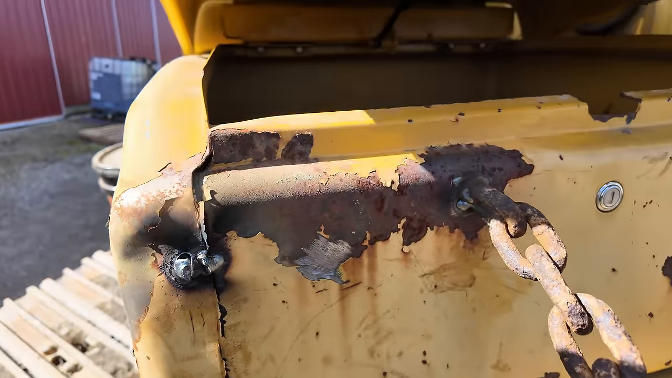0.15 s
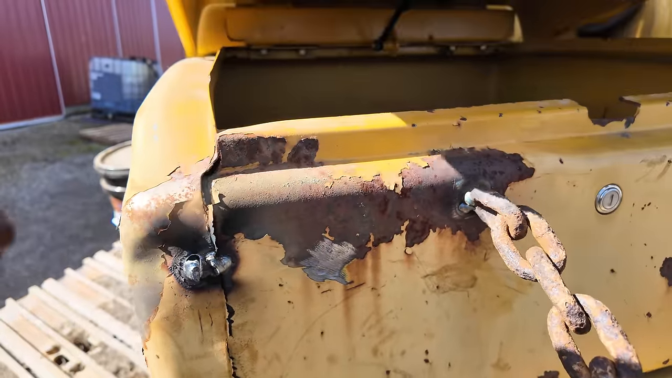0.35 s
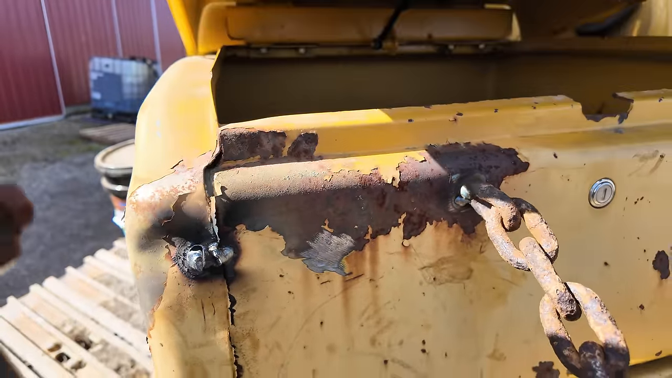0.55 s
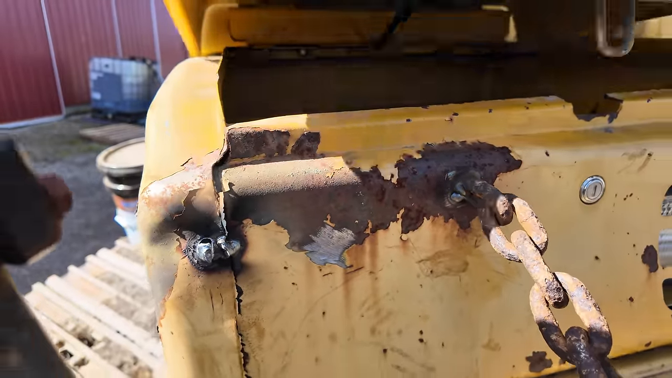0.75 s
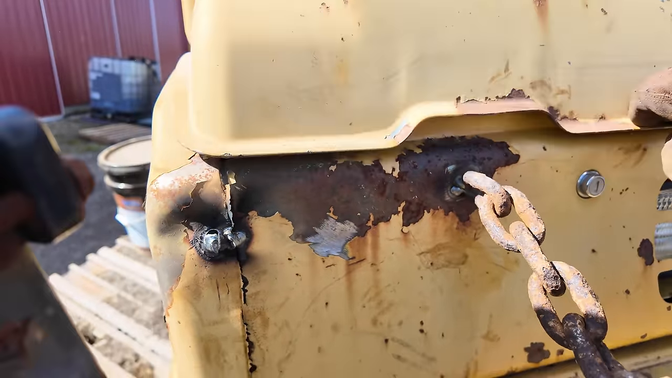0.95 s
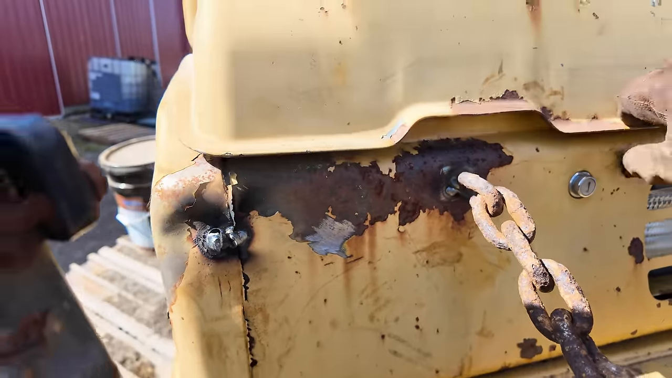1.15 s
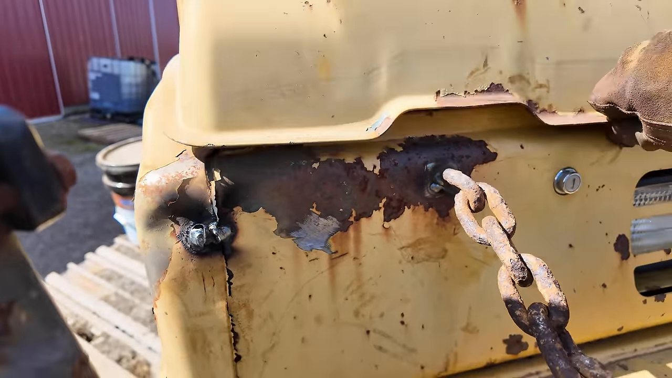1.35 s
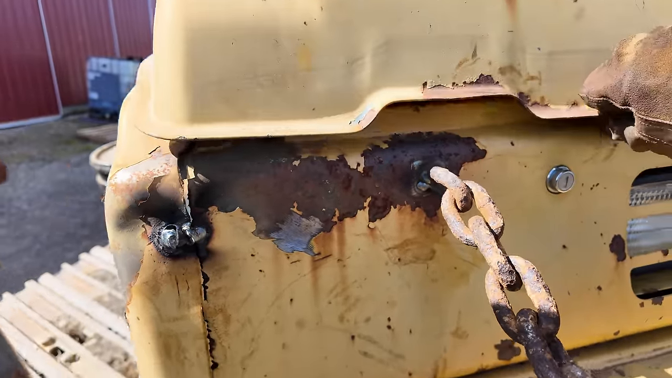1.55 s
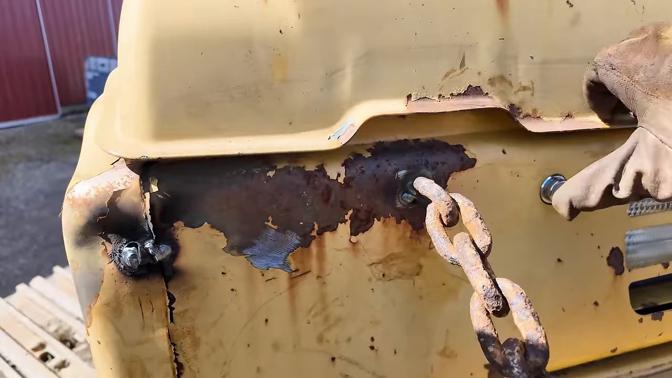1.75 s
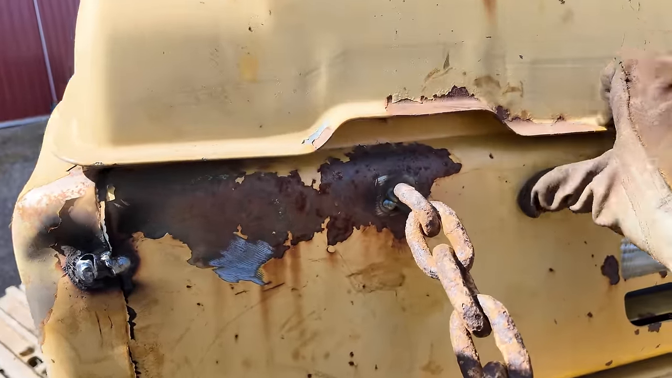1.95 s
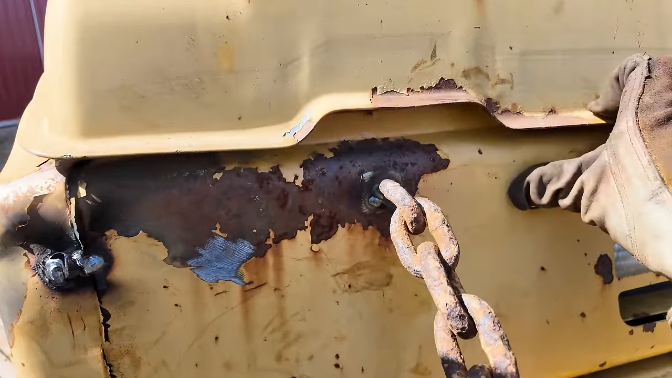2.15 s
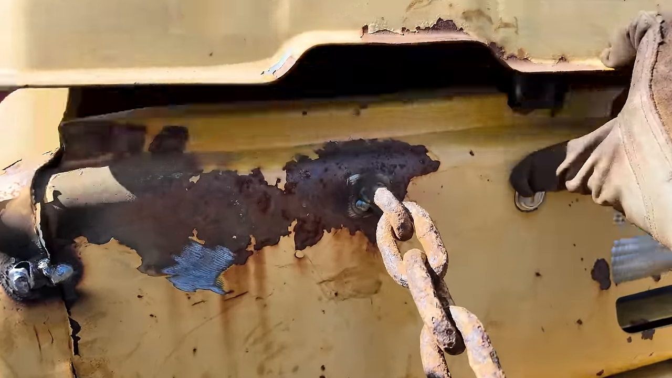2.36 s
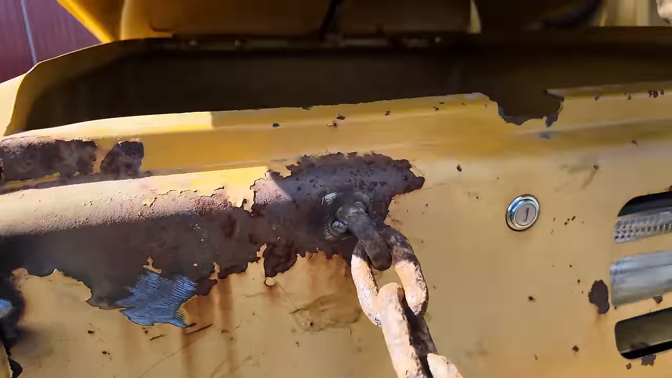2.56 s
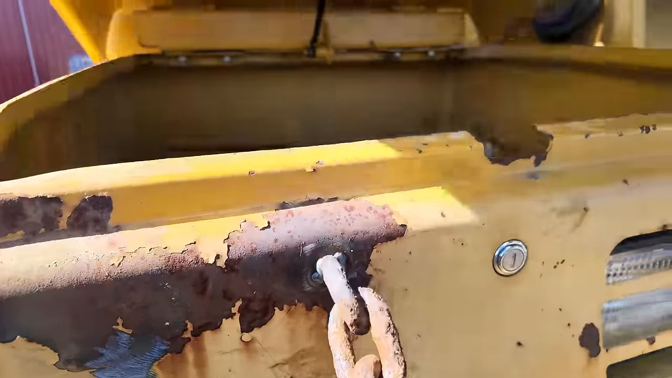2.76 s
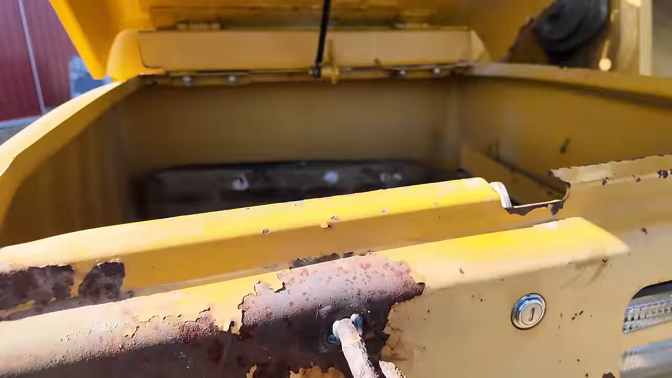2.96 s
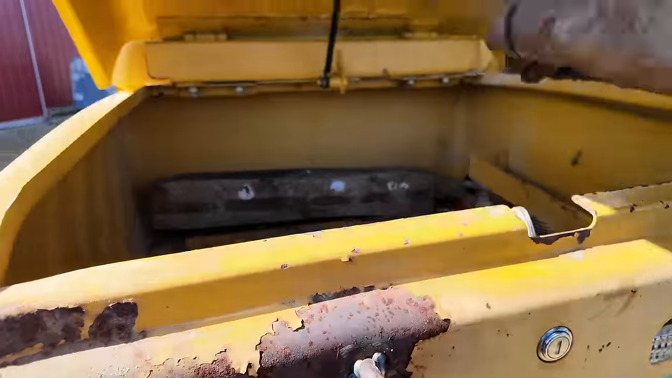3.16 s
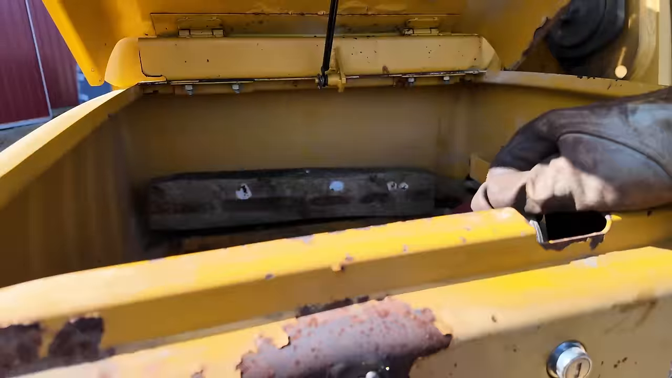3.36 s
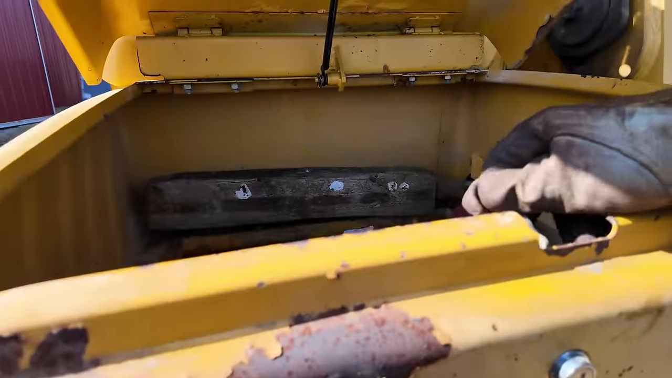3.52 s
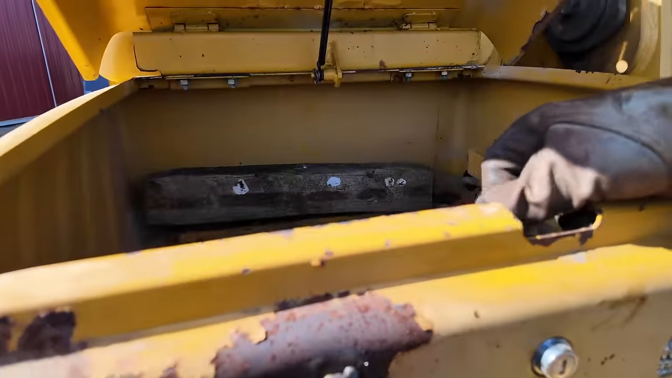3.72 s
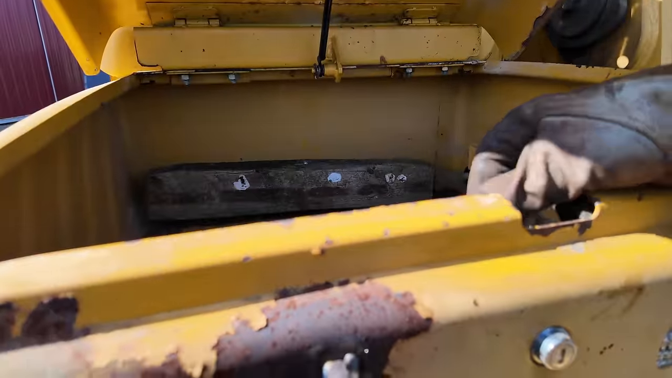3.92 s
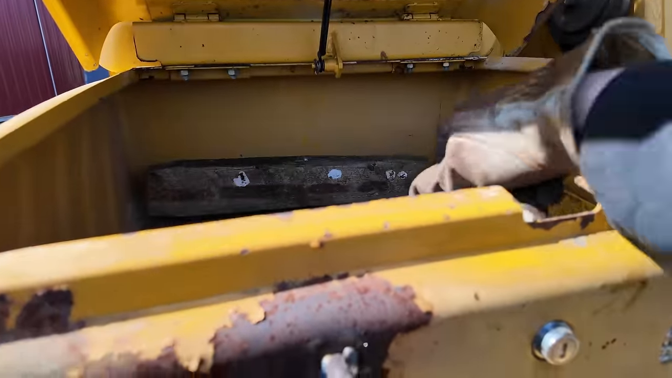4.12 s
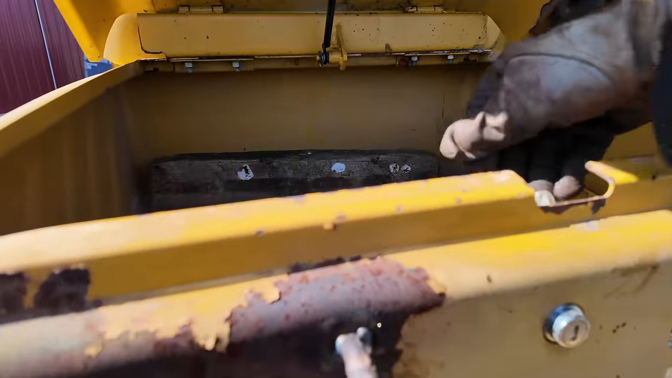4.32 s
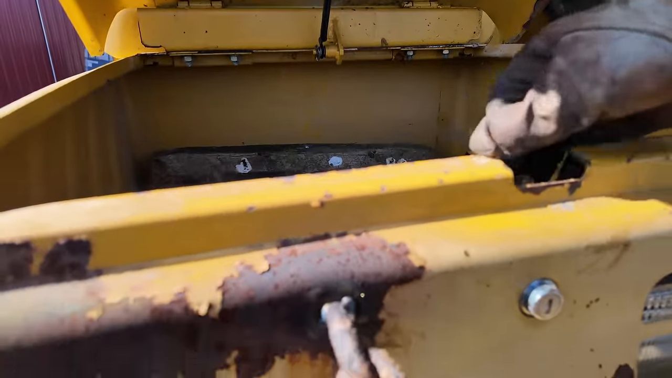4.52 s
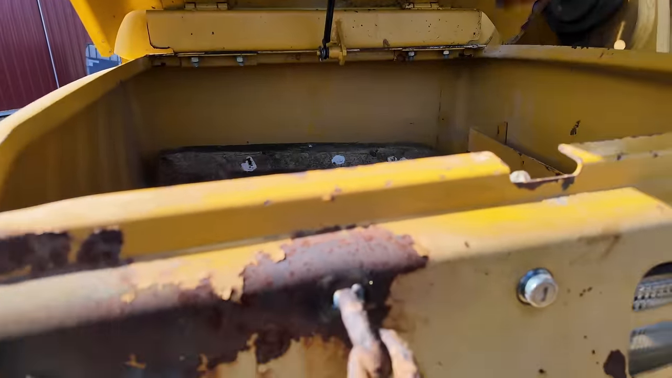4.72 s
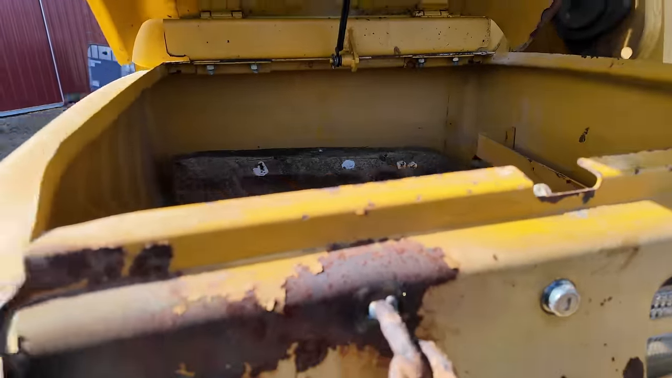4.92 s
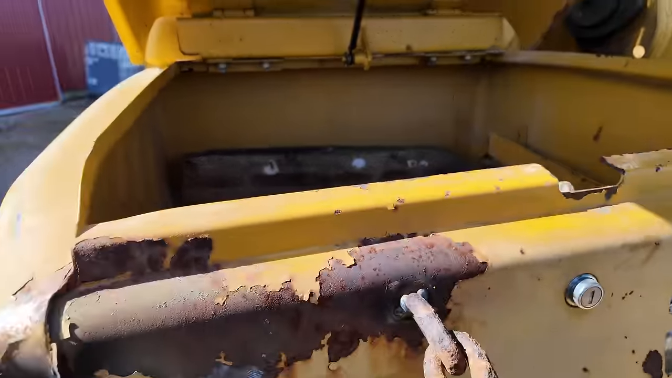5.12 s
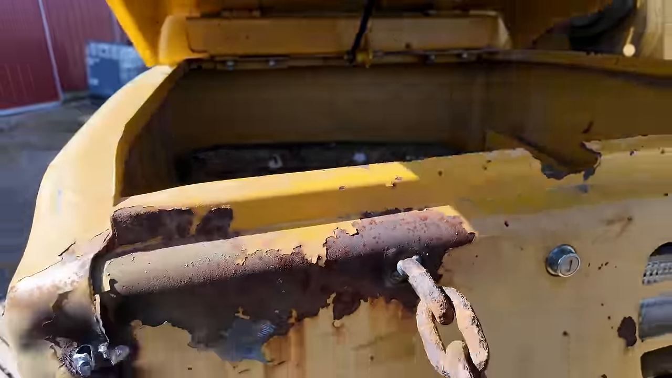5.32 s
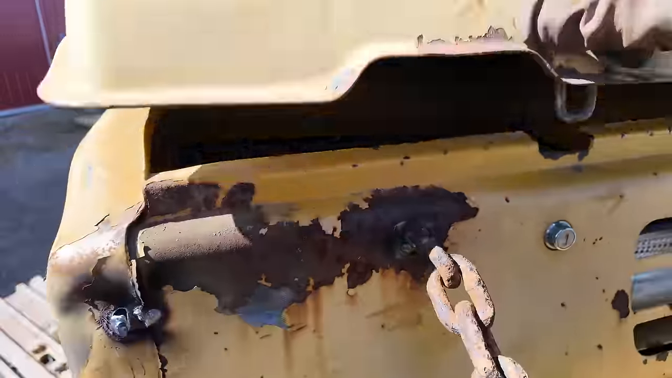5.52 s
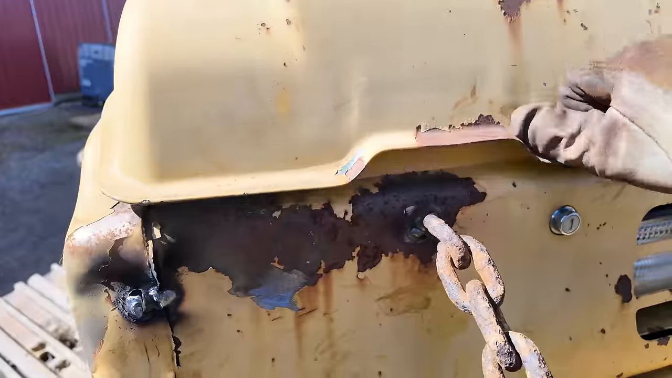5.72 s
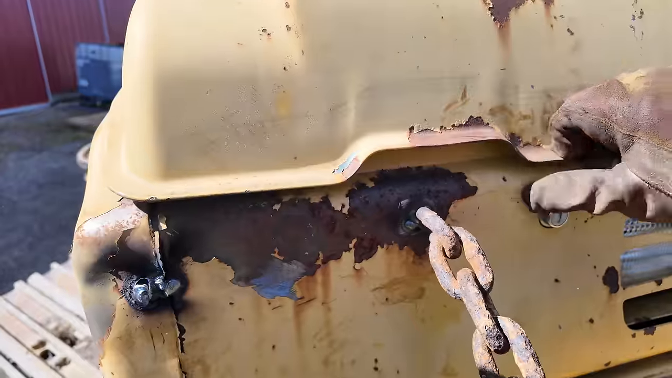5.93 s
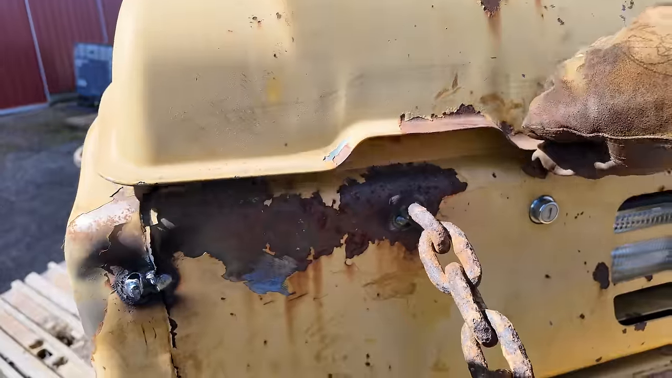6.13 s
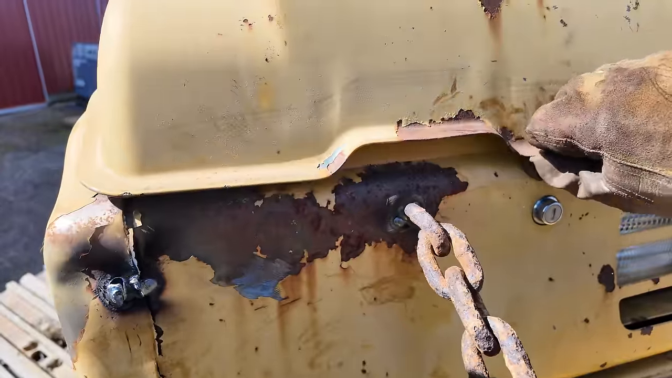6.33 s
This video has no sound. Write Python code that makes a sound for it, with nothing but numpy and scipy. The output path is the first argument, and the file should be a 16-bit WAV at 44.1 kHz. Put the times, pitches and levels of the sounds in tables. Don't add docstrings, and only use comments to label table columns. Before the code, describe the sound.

A diesel engine idles low in an open yard with faint wind rumble. Close to the microphone, a heavy steel lid drops onto its rim at one second, clanging, rattling and booming. Small metal touches follow, then a faint hiss as it lifts. Two hard, hollow latch snaps come about a second apart. Near the end the lid slams again with a deeper boom, bouncing and rattling, then a small final clack.

```python
import sys
import numpy as np
from scipy import signal
from scipy.io import wavfile
from scipy.ndimage import uniform_filter1d

SR = 44100
rng = np.random.default_rng(int(sys.argv[2]) if len(sys.argv) > 2 else 0)


def wav_out(sig):
    wavfile.write(sys.argv[1], SR, np.round(np.clip(np.atleast_2d(sig).T, -1, 1) * 32767).astype(np.int16))


def field_ratio(decibels):
    return 10 ** (np.asarray(decibels, dtype=float) / 20)


N = 281358
TIME_S = np.arange(N) / SR

# middle_s, width_s, level_db
GUSTS = [(0.02, 0.096, -55), (0.59, .04, -58), (0.82, 0.068, -48), (1.3, 0.4, -49), (2.3, .12, -45),
         (2.5, 0.065, -47), (3.0, 0.046, -47), (3.55, .1, -49), (4.46, 0.063, -43), (5.21, 0.041, -51),
         (5.75, 0.083, -40), (6.28, 0.062, -42)]
# freq_hz, level_db
WIND_SPECTRUM = [(15, -44), (30, -24.5), (50, -4.5), (75, 6.5), (130, 11), (300, -60.0)]

# time_s, rate_hz
FIRING_RATE = [(0, 34), (1.5, 35), (6.38, 35)]
# time_s, level_db
ENGINE_LEVEL = [(0, -41), (2.4, -39.5), (3.1, -39.5), (3.4, -38), (4.3, -41), (4.8, -39), (6.38, -40.5)]
# freq_hz, density_db_per_hz
ROAR_SPECTRUM = [(15, -64.5), (25, -36.5), (59, -17), (117, -23.5), (153, -2.5), (180, -10), (242, -1),
                 (301, -12), (641, -14.5), (695, -18), (818, -14.5), (911, -21), (1260, -28), (1790, -40),
                 (16000, -76.5)]
# freq_hz, width_hz, gain_db
ROAR_PEAKS = [(224, 16.7, -2.5), (600, 330, 1.5), (810, 130, -2.5), (1283, 66, 5.5), (2630, 730, 9.5)]
# multiple_of_rate, level_db
FIRING_ORDERS = [(2, -20), (6, -7), (7, -2.5), (8, -6), (14, -16.5), (15, -13.5), (16, -11.5), (17, -16.5),
                 (18, -14.5), (23, -16)]
CYLINDER_DB = [-1, 1.5, -2, 0.1, -2, 4]
# time_s, level_db
KNOCK_LEVEL = [(0, -35.5), (1.8, -32), (2.2, -19), (2.9, -26), (3.4, -35.5), (6.38, -35)]

# freq_hz, density_db_per_hz
STRUT_SPECTRUM = [(1200, -25.5), (2000, -1), (3200, 1.5), (4300, -7), (7500, -15), (10500, -24.5),
                  (13000, -27.5), (16000, -37.5)]
# start_s, length_s, level_db
STROKES = [(1.68, .18, -75), (2.17, .26, -69.5), (2.584, 0.57, -64.5), (3.2, .24, -71.5), (4.02, 0.15, -71),
           (4.96, 0.26, -69), (5.35, 1.1, -72.5)]
# freq_hz, t60_s
YARD_DECAY = [(150, 1), (500, 0.74), (2000, 0.27), (6000, 0.18), (12000, 0.15)]

# start_s, level_db, pitch_hz
GRIT = [(1.863, -60, 6300), (1.863, -64, 7800), (1.863, -66, 9500), (3.547, -58, 8000), (3.588, -57, 6600),
        (3.672, -64, 7300), (5.193, -64, 8000), (6.131, -63, 7000)]
# pitch_hz, level_db, t60_s
LINK_MODES = [(6035, 0, .075), (7350, -11, .06), (8700, -15, .05)]
# start_s, level_db
LINK_TAPS = [(1.170, -63), (1.219, -61), (1.263, -65), (1.322, -69)]
# start_s, level_db, pitch_hz, t60_s
CATCH_RINGS = [
    (1.090, -47, 7100, .05),
    (2.134, -68, 8500, .04),
    (4.055, -62, 7000, .05),
    (5.722, -30, 7300, .09),
    (5.802, -42, 7300, .06),
]
# start_s, level_db, pitch_hz, t60_s
SLAPS = [
    (1.0085, -8.5, 1170, 0.015),
    (1.0080, -5, 472, 0.025),
    (4.433, -17.5, 217.6, 0.22),
    (3.882, -36, 1400, .04),
    (3.882, -36, 2080, .04),
    (4.4404, -9, 425, .08),
    (1.501, -35.5, 2030, 0.068),
    (4.090, -24, 330, .1),
    (1.955, -29.5, 450, 0.15),
]
# start_s, level_db, pitch_hz, rise_s, t60_s
LID_FLEXES = [
    (1.001, -26, 84, 0.04, 0.8),
    (1.04, -17, 133.6, 0.056, 0.4),
    (5.72, -3.5, 75.5, 0.11, 0.34),
    (5.738, -21, 135.7, 0.062, 1),
    (5.75, -31, 53.4, 0.07, 0.99),
    (5.971, -22, 80.5, 0.021, 0.34),
]

RANGE_HZ = [150, 1500, 5000, 16000]
# pitch_hz, level_db, t60_s
LID_MODES = [(197, -8.5, 0.27), (240.6, -4.5, 0.44), (278, -16.5, 0.34), (315.2, 2.5, 0.17),
             (398, -6, 0.12), (422, -2.5, 0.25), (478, -5.5, 0.15), (546, -17, 0.15), (619, -21.5, .3),
             (697, -16.5, 0.4), (877, -13, 0.2), (1140, -18.5, 0.049), (1356, -14.5, 0.034)]
BOX_MODES = [(432, 1.5, .09), (235, -15, .15), (415, -12, .25), (312, -13, .1), (605, -6, .08),
             (520, -10, .15), (590, -17, .35), (721, -15, .3), (890, -11, .1), (1030, -21, .2),
             (1140, -9, .07), (1400, -11, .06), (1790, -18, .06)]
# freq_hz, level_db
LID_CLANG = [(150, -4.5), (300, 3), (600, -1.5), (1000, -12.5), (1499, -17.5), (1500, -7.5), (2200, -3.5),
             (2800, 3.5), (3700, -2.5), (4400, -11), (5800, -10), (7300, -15), (10000, -29.5), (16000, -57)]
BOX_CLANG = [(150, -13.5), (300, -2), (600, -11), (1000, -12.5), (1499, -10.5), (1500, -13), (1900, -7),
             (2400, 6), (3200, -2), (4400, -6), (6000, -9), (10000, -22.5), (13000, -42), (16000, -40)]
# freq_hz, t60_s
LID_RING = [(200, 0.71), (700, 0.71), (1300, 0.25), (3000, 0.092), (6000, 0.074), (12000, 0.073)]
BOX_RING = [(200, 0.91), (700, 0.93), (1300, 0.069), (3000, 0.099), (6000, 0.058), (12000, 0.054)]
# gap_s, clang_loss_db, boom_loss_db, hardness_loss_db_per_octave,
# ring_time_factor
LID_CHATTER = (.0142, 6.8, 3.67, 2, 1.05)
LATCH_CHATTER = (.0072, 12, 5.8, 1.5, 1.55)
# start_s, clang_db, boom_db, hardness_db_per_octave, ring_time_factor
LATCH_SNAPS = [
    (1.9445, -51.5, -37, 3, 0.88),
    (3.3104, -57.5, -33, 7, 0.63),
    (3.4645, -16.5, -4, 2, 0.28),
    (3.8806, -36, -27.5, -6.5, 0.8),
    (4.0892, -60, -31, -8, 0.85),
    (4.4331, -15.5, -6, 0, 1.4),
    (4.9776, -50.5, -37.5, -1, 3.1),
]
# start_s, clang_db, boom_db, hardness_db_per_octave, ring_time_factor
LID_LANDINGS = [(0.9919, -11.5, -12.5, 1, 0.46), (1.0087, -16, -11.5, 1.5, 2.4),
                (1.0264, -26.5, -18.5, 4.5, 2.3), (1.0775, -22, -19, 0.8, 0.76), (1.1232, -36, -23, 1, 1),
                (1.1973, -45.5, -25.5, -0.5, 0.75), (1.2706, -52, -43, -2, 2),
                (1.4991, -34, -26.5, -0.8, 1), (1.5294, -48, -35.5, 3, 1.4), (1.5524, -54, -37.5, 3, 2),
                (5.693, -14, -17, 6.5, .57), (5.7199, -10.5, -7, 4.5, 0.52), (5.7377, -14, -7, 2, 0.36),
                (5.7562, -18.5, -8, 2.5, 1), (5.8008, -18, -8.5, 0.5, 1.06), (5.8116, -22, -17, 2, .75),
                (5.889, -29, -17.5, -2.5, 3.5), (5.9048, -40.5, -24.5, 9, 0.53),
                (6.1891, -27.5, -24.5, 1.5, 0.78), (6.2329, -42, -32.5, 20, 1.3)]


def evened(x):
    return x / np.sqrt(np.mean(x ** 2) + 1e-20)


def read(points, hz):
    point_hz, value = np.transpose(points)
    return np.interp(np.log(hz + 1), np.log(point_hz + 1), value)


def curve(points):
    return np.interp(TIME_S, *np.transpose(points))


def add(mix, start_s, sound):
    part = mix[round(start_s * SR):][:len(sound)]
    part += sound[:len(part)]


def drift(top_hz):
    sines = [np.sin(2 * np.pi * (hz * TIME_S + rng.random())) / np.sqrt(hz)
             for hz in np.geomspace(top_hz / 10, top_hz, 8)]
    return evened(sum(sines))


def coloured(gain_db, patchy_db):
    real, imag, patches = rng.standard_normal((N // 512 + 6, 1025, 3)).T
    patches = uniform_filter1d(patches, 10, 0)
    patches = evened(uniform_filter1d(patches, 8, 1))
    spectrum_db = gain_db(np.fft.rfftfreq(2048, 1 / SR))[:, None]
    bins = (real + 1j * imag) * field_ratio(spectrum_db + patchy_db * patches)
    return evened(signal.istft(bins, nperseg=2048, noverlap=1536)[1][:N])


def ringing(pitch_hz, t60_s, t):
    decay = field_ratio(-60 * t / np.reshape(t60_s, (-1, 1)))
    return np.sin(2 * np.pi * np.outer(pitch_hz, t)) * decay


def wind():
    lumps = coloured(lambda hz: read(WIND_SPECTRUM, hz), patchy_db=-0.5)
    flow = field_ratio(-63)
    for middle_s, width_s, level_db in GUSTS:
        flow = flow + field_ratio(level_db) * np.exp(-((TIME_S - middle_s) / width_s) ** 2)
    return flow * field_ratio(2.3 * drift(top_hz=2.8)) * lumps


def roar_db(hz):
    peaks_db = sum(gain_db / (1 + (2 * (hz - peak_hz) / width_hz) ** 2)
                   for peak_hz, width_hz, gain_db in ROAR_PEAKS)
    return read(ROAR_SPECTRUM, hz) + peaks_db


def engine():
    firings = np.cumsum(curve(FIRING_RATE)) / SR - .2
    puff = uniform_filter1d(np.exp(-(firings % 1) / .35), 150)
    roar = coloured(roar_db, patchy_db=2.04)
    middle_band = signal.butter(2, [400, 2500], "band", fs=SR, output="sos")
    throb = 1.3 * (puff - puff.mean()) * signal.sosfilt(middle_band, roar)
    orders = sum(field_ratio(level_db + 3 * drift(top_hz=4.)) * np.sin(2 * np.pi * (k * firings + rng.random()))
                 for k, level_db in FIRING_ORDERS)
    cylinder = field_ratio(3 * np.array(CYLINDER_DB)[firings.astype(int) % 6])
    knock = cylinder * puff ** 2 * rng.standard_normal(N)
    cover = signal.iirpeak(1300, 9, fs=SR)
    knock = signal.lfilter(*cover, signal.lfilter(*cover, knock))
    knock = field_ratio(curve(KNOCK_LEVEL)) * evened(knock)
    return field_ratio(curve(ENGINE_LEVEL)) * (roar + throb + orders + knock)


def strut():
    peak_at, edge = 0.56, 0.73
    flow = field_ratio(-72)
    for start_s, length_s, level_db in STROKES:
        done = np.clip((TIME_S - start_s) / length_s, 0, 1) ** (np.log(.5) / np.log(peak_at))
        flow = flow + field_ratio(level_db) * abs(np.sin(np.pi * done)) ** edge
    return flow * coloured(lambda hz: read(STRUT_SPECTRUM, hz), patchy_db=1.5)


def yard(x):
    hz, t, bins = signal.stft(rng.standard_normal(SR), SR, nperseg=256)
    bins = bins * field_ratio(-60 * t / read(YARD_DECAY, hz)[:, None])
    tail = signal.istft(bins, SR, nperseg=256)[1]
    tail[:500] = 0
    return signal.fftconvolve(x, tail / np.linalg.norm(tail))[:N]


def small_parts():
    t, out = np.arange(8000) / SR, np.zeros(N)
    link = [(start_s, tap_db + mode_db, pitch_hz, t60_s)
            for start_s, tap_db in LINK_TAPS for pitch_hz, mode_db, t60_s in LINK_MODES]
    grit = [(*row, .008) for row in GRIT]
    for start_s, level_db, pitch_hz, t60_s in link + grit + CATCH_RINGS + SLAPS:
        rise = np.minimum(t / (0.038 * t60_s), 1)
        add(out, start_s, field_ratio(level_db) * ringing([pitch_hz], t60_s, t)[0] * rise)
    return out


def lid_flex():
    t, out = np.arange(SR) / SR, np.zeros(N)
    spreads = rng.uniform(-1.02, 1, (len(LID_FLEXES), 8))
    for (start_s, level_db, pitch_hz, rise_s, t60_s), spread in zip(LID_FLEXES, spreads):
        boom = ringing(pitch_hz * (1 + .2 * spread), t60_s, t).sum(0) / np.sqrt(8)
        add(out, start_s, field_ratio(level_db) * boom * (1 - np.exp(-(t / rise_s) ** 2)))
    return out


def contacts(landings, chatter, sizzle_db, count):
    gap_s, clang_loss_db, boom_loss_db, hardness_loss, chatter_ring = chatter
    k = np.arange(count + 1)
    later = k > 0
    next_s = [row[0] for row in landings[1:]] + [np.inf]
    chances = rng.standard_normal((len(landings), count + 1, 2))
    hits = []
    for (start_s, clang_db, boom_db, hardness, ring), until_s, chance in zip(landings, next_s, chances):
        at_s = start_s + gap_s * (k + .15 * chance[:, 0] * later)
        clangs_db = clang_db - clang_loss_db * k + 3.5 * chance[:, 1] * later
        booms_db = boom_db - boom_loss_db * k
        hards = hardness - hardness_loss * k
        sizzles_db = sizzle_db + 1.187 * clangs_db + 0.84 * hards
        rings = np.where(later, chatter_ring, ring)
        rows = np.transpose([at_s, clangs_db, booms_db, sizzles_db, rings, hards])
        hits += list(rows[at_s < until_s - gap_s / 2])
    return hits


def steel(hits, modes, clang, ring, spot_db, rise_s, crowd_db):
    t, out = np.arange(SR // 2) / SR, np.zeros(N)
    rise = 1 - np.exp(-t / rise_s)
    pitch_hz, mode_db, t60_s = np.transpose(modes)
    signs = (-1) ** np.arange(len(pitch_hz))[:, None]
    panel = ringing(pitch_hz, t60_s, t) * signs * rise
    banks = []
    counts, sizes = (110, 250, 450), (SR // 2, SR // 5, SR // 8)
    for low_hz, high_hz, count, size in zip(RANGE_HZ, RANGE_HZ[1:], counts, sizes):
        crowd_hz = rng.uniform(low_hz, high_hz, count)
        crowd_t60_s = read(ring, crowd_hz) * rng.uniform(.7, 1.0, count)
        crowd = ringing(crowd_hz, crowd_t60_s, t[:size])
        if low_hz < RANGE_HZ[1]:
            crowd = crowd * rise
        banks.append((read(clang, crowd_hz), np.log2(crowd_hz), crowd))
    chances = rng.standard_normal((len(hits), 4, 450))
    for (start_s, clang_db, boom_db, sizzle_db, hold, hardness), chance in zip(hits, chances):
        grip = field_ratio(-60 * t * (1 / np.clip(hold, .2, 3) - 1 / 3) / 0.51)
        grip = grip * np.minimum(t / (.00004 * field_ratio(-.75 * clang_db)), 1)
        weight = field_ratio(mode_db + spot_db * chance[3, :len(pitch_hz)]) / np.linalg.norm(field_ratio(mode_db))
        add(out, start_s, field_ratio(boom_db) * grip * (weight @ panel))
        levels_db = (boom_db + crowd_db, clang_db, sizzle_db)
        for level_db, (weight_db, octave, crowd), spot in zip(levels_db, banks, chance):
            weight = field_ratio(weight_db + np.clip(hardness, -4, 10) * octave) * spot[:len(octave)]
            weight = weight / np.linalg.norm(weight)
            add(out, start_s, field_ratio(level_db) * grip[:crowd.shape[1]] * (weight @ crowd))
    return out


def panels():
    snaps = contacts(LATCH_SNAPS, LATCH_CHATTER, sizzle_db=-3.5, count=1)
    landings = contacts(LID_LANDINGS, LID_CHATTER, sizzle_db=-11, count=3)
    box = steel(snaps, BOX_MODES, BOX_CLANG, BOX_RING, spot_db=3.0, rise_s=0.00081, crowd_db=-9)
    lid = steel(landings, LID_MODES, LID_CLANG, LID_RING, spot_db=2, rise_s=0.0011, crowd_db=-5.0)
    return signal.sosfilt(signal.butter(3, 130, "high", fs=SR, output="sos"), box + lid)


def scene():
    metal = small_parts() + lid_flex() + panels()
    mix = wind() + engine() + strut() + metal + field_ratio(-18.5) * yard(metal)
    return mix[None]


def roll_off(x):
    return signal.sosfilt(signal.butter(12, 15850, fs=SR, output="sos"), x)


def record(dry):
    limited = np.tanh(dry / 1.482) * 1.662
    low_cut = signal.butter(2, 45, "high", fs=SR, output="sos")
    return roll_off(signal.sosfilt(low_cut, limited))


dry = scene()
out = record(dry)
wav_out(out)
```